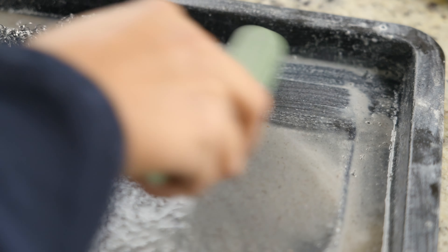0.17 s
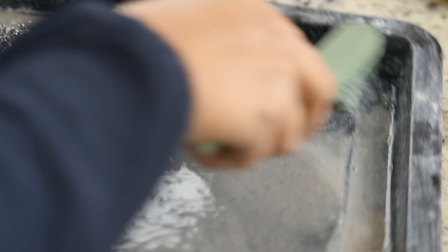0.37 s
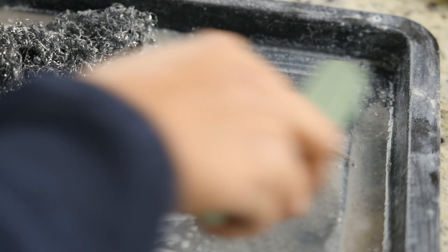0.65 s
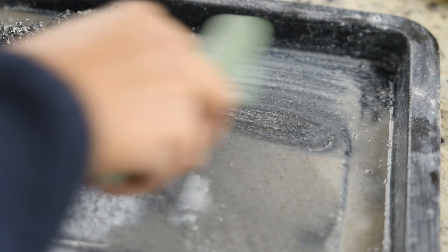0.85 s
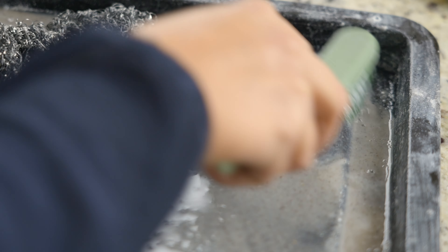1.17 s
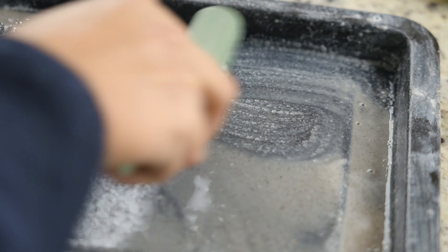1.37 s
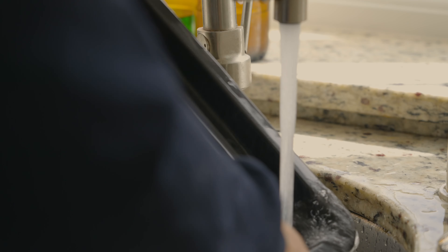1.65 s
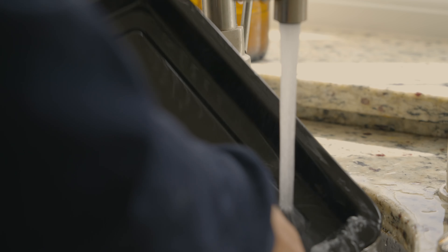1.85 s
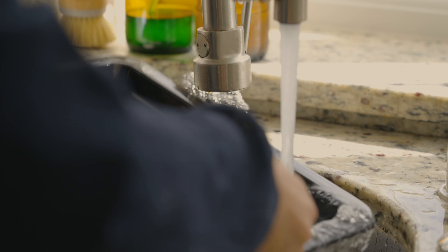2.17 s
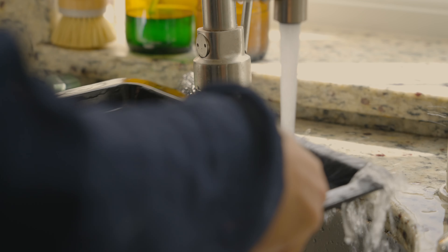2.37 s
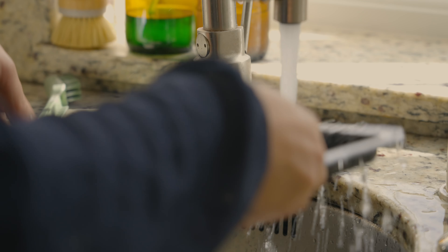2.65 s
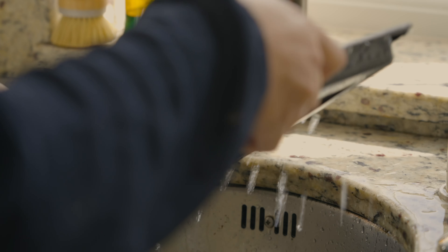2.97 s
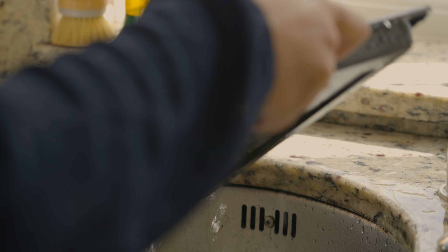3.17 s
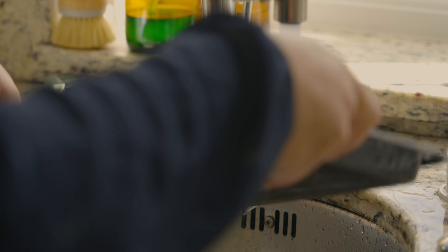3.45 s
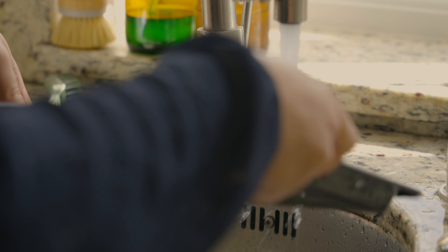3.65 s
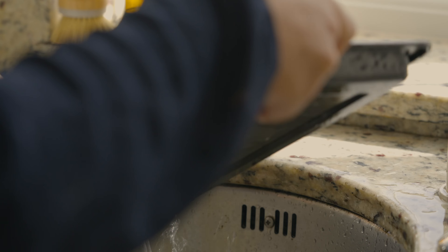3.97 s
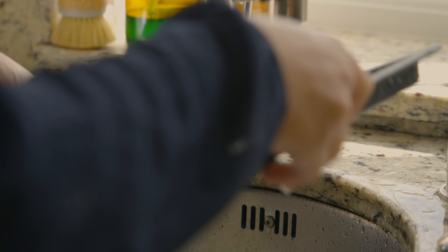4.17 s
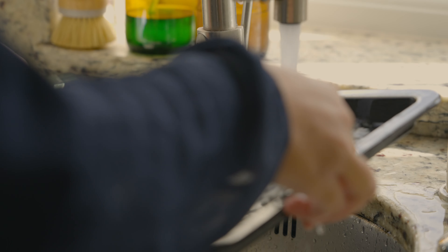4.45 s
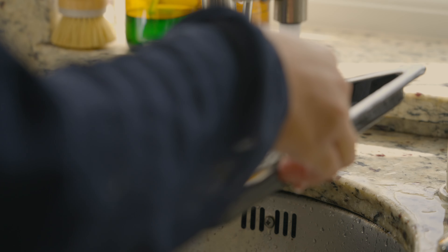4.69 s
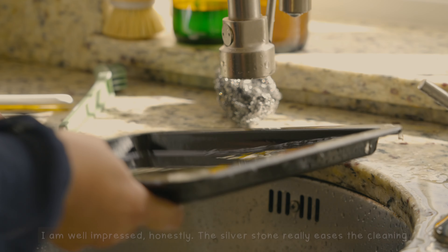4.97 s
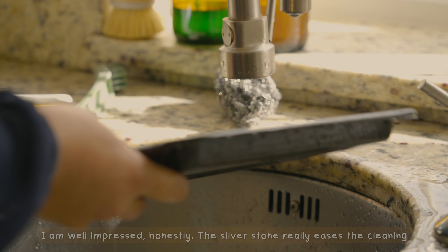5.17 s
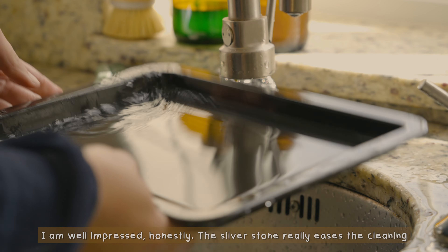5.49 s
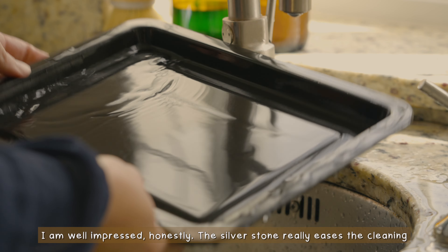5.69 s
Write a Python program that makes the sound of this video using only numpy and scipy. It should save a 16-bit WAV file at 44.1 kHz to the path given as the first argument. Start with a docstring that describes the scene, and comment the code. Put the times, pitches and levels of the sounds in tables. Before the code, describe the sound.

Quick rhythmic brush strokes rasp on a wet, gritty metal tray, then a tap rinses it with splashing and one loud clank before sudden quiet.

```python
"""Scrubbing and rinsing a baking tray

Quick brush strokes scour a wet, pasted tray: noise clicks hiss and rasp, and excite resonances of the sheet.
A running tap then rinses it: shaped clicks make spray and drumming, swarms of decaying sines make froth.
Water pours off and gurgles in the steel sink; the tray clanks against it, ringing decaying modes.
The water stops abruptly, leaving a quiet kitchen of shaped noise, and noise bursts for light clinks of the
tray being turned and thin high sizzles of water running over it."""
import sys
import numpy as np
from scipy import signal
from scipy.fft import rfft, irfft
from scipy.io import wavfile
from scipy.ndimage import map_coordinates

SR = 44100
rng = np.random.default_rng(int(sys.argv[2]) if len(sys.argv) > 2 else 0)


def file_out(sig):
    """Save sig as 16-bit WAV at sys.argv[1]."""
    # one column per channel
    cols = np.atleast_2d(sig).T
    # limit, then scale
    lim = np.clip(cols, -1, 1)
    pcm = np.round(lim * 32767).astype(np.int16)
    wavfile.write(sys.argv[1], SR, pcm)


N = 256662
TIME = np.arange(N) / SR

# All levels are relative, ahead of the layer gains.
# brush strokes: (top speed [s], hiss [dB], rise [s], fall [s], dig from pressing down [dB], sheet shudder [dB])
STROKES = [(0.096, -29.5, 0.026, 0.042, -31.5, -59), (0.269, -26.5, 0.022, 0.023, -65, -56),
           (0.46, -28, 0.026, 0.066, -21.5, -42.5), (0.682, -26, 0.038, 0.024, -38, -41.5),
           (0.849, -28.5, 0.0044, 0.065, -41, -39), (1.08, -28, 0.025, 0.032, -42, -36.5),
           (1.2, -31.5, 0.031, 0.038, -79, -54), (1.286, -27.5, 0.019, 0.054, -24, -38.5),
           (1.485, -34.5, 0.028, 0.071, -42, -41.5)]
# brush slowing to turn round: (time [s], level change [dB])
TURNS = [(0.035, -5.5), (0.19, -3.5), (0.59, -2.5), (0.755, -3.5), (0.99, -2), (1.406, -11), (1.56, -3.5)]
# spectrum of the bristle hiss: (frequency [Hz], level [dB])
HISS_SPECTRUM = [(300, -30), (1500, 3), (3000, -1.5), (4500, 0.5), (7000, 3.5), (9500, 0), (13500, 4),
                 (16000, -0.5)]
# spectrum of the grit: (frequency [Hz], level [dB])
GRIT_SPECTRUM = [(150, -36), (320, -27), (480, -13), (800, 6), (1300, 4), (2000, 3), (3400, 2.5),
                 (5000, -3), (7500, -8.5), (14000, -13)]
# modes of the tray pressed on the counter: (frequency [Hz], width [Hz], rubbed [dB], knocked [dB])
PRESSED_MODES = [(484, 15, -9.5, -11), (576.5, 51, 3, -3), (705, 52, -8.5, 3.5), (918, 17, -4, -20),
                 (1077, 34, -9, -3), (1375, 65, -13, -4), (1617, 46, -3, -12), (2052, 47, -2.5, -7),
                 (2860, 108, -6.5, 10.5), (3370, 88, -1.5, -30)]
# brush head knocking on the rim: (time [s], ring [dB], tick [dB])
BUMPS = [(0.3905, -26.5, -40), (0.3935, -20.5, -16), (1.436, -33, -30)]
# spray where the jet lands: (time [s], level [dB])
JET = [(1.57, -29), (1.67, -31.5), (1.79, -36), (2.67, -39.5), (2.78, -40), (3.02, -43.5), (3.17, -40),
       (3.41, -35.5), (3.87, -38.5), (4.1, -37.5), (4.46, -36.5)]
# jet drumming on the sheet: (time [s], level [dB])
DRUMMING = [(1.57, -43.5), (1.7, -54), (1.91, -42), (2.47, -47), (2.49, -48.5), (2.63, -40), (2.83, -40),
            (3.25, -58), (3.27, -47.5), (3.37, -58.5), (4.41, -41), (4.46, -44)]
# jet catching the swinging tray and fanning out: (time [s], extra spray [dB], extra splashing [dB])
SURGES = [(1.79, 4.5, 12.5), (2.02, 6, -1), (2.16, 4, -9), (2.57, 3.5, 2), (3.44, 3, -2.5), (3.87, 3, 6),
          (4.21, 2.5, 3)]
# spectrum of the spray: (frequency [Hz], level [dB])
SPRAY_SPECTRUM = [(500, -28), (2000, -11), (3200, -5.5), (4500, -2), (6500, -3), (9000, -5), (12000, -4.5),
                  (14500, -5.5), (16000, -2.5)]
# spectrum of the splashing: (frequency [Hz], level [dB])
SPLASH_SPECTRUM = [(200, -23.5), (600, -3), (1000, -7.5), (1400, -2.5), (2100, 2), (3200, -4), (4300, -2),
                   (6000, -16.5), (10000, -17)]
# spectrum of the stray drops: (frequency [Hz], level [dB])
DROP_SPECTRUM = [(500, -27.5), (1500, -11), (3000, -5), (5500, -2.5), (9000, -3), (15000, -11)]
# spectrum of the drumming: (frequency [Hz], level [dB])
DRUM_SPECTRUM = [(40, -17), (90, -11.5), (140, -7.5), (190, -1), (260, -0.5), (330, 6), (480, -3),
                 (700, -6), (950, -10), (1400, -26), (3000, -41.5)]
# water pouring off the tilted tray into the sink: (time [s], level [dB])
POUR = [(2.9, -64), (3.26, -50), (3.29, -43.5), (3.7, -52.5), (3.88, -41), (4.05, -44), (4.21, -40),
        (4.58, -42), (4.85, -59)]
# spectrum of the water churning in the sink: (frequency [Hz], level [dB])
BASIN_SPECTRUM = [(300, -23), (560, 4), (700, -8), (870, 1), (1200, -10.5), (1700, -3.5), (2100, -10),
                  (2600, -6), (3300, -25)]
# large air pockets ringing in the water: (time [s], level [dB], pitch [Hz], T60 [s], pitch rise [octave/s])
BUBBLES = [(3.044, -13, 989, 0.055, 4.5), (3.127, -28.5, 1535, 0.069, 5), (3.1628, -15.5, 6580, 0.01, -4),
           (3.396, -22, 3130, 0.035, 9), (3.569, -26, 683, 0.034, 1), (3.593, -29, 663, 0.12, -3),
           (3.6949, -16, 905, 0.074, -1), (3.716, -22, 1450, 0.031, 18), (3.802, -19.5, 1025, 0.019, 13.5),
           (3.838, -14.5, 890, 0.038, 15), (3.896, -22, 1050, 0.021, 25), (3.947, -20.5, 825, 0.042, 0.5),
           (3.973, -17.5, 676, 0.035, -11.5), (4.0214, -14.5, 920, 0.052, 1), (4.083, -19, 4680, 0.026, 5),
           (4.108, -23, 2457, 0.045, 5.5), (4.152, -17.5, 807, 0.04, 15), (4.173, -27.5, 824, 0.2, -8.5),
           (4.239, -20, 575, 0.066, 4), (4.2807, -18, 2460, 0.019, 10), (4.3385, -19.5, 2070, 0.027, 13.5),
           (4.388, -23.5, 925, 0.041, 4.5), (4.419, -22, 2450, 0.033, -2), (4.7851, -20, 1043, 0.021, 9)]
# gouts of water slapping the sink or thudding on the sheet: (time [s], level [dB], centre [Hz], T60 [s])
SLAPS = [(1.598, -33.5, 2300, 0.1), (1.757, -33, 1700, 0.088), (1.87, -35.5, 94, 0.12),
         (2.012, -41, 94, 0.28), (2.563, -29.5, 4500, 0.087), (2.947, -29.5, 3440, 0.032),
         (3.2664, -33, 590, 0.066), (3.265, -27.5, 2000, 0.018), (3.296, -23.5, 1630, 0.055),
         (3.326, -24.5, 1550, 0.04), (3.408, -31, 2030, 0.033), (3.466, -24, 7040, 0.023),
         (3.493, -16, 3360, 0.013), (3.533, -19.5, 3650, 0.024), (3.839, -16, 4630, 0.036),
         (4.1, -23.5, 5180, 0.05), (4.3315, -23.5, 2080, 0.017), (4.649, -25.5, 3560, 0.037),
         (4.695, -29.5, 5490, 0.034)]
# modes of the free tray: (frequency [Hz], level [dB], ungripped T60 [s])
FREE_MODES = [(172.8, -4.5, 0.2), (239, -2.5, 0.75), (280, -8, 1.7), (347, -6, 0.17), (390.5, -6, 0.21),
              (476.6, 4, 0.66), (598, -9.5, 0.54), (626, -7.5, 0.47), (789, -14.5, 0.18), (877, -13, 0.24),
              (960, -13.5, .3), (1325, -5, .15), (1767, -3, .2), (2085, -12.5, 0.084), (2425, -10, 0.27),
              (2730, -3, 0.15), (3110, -3.5, 0.43), (3130, 1.5, .2), (3640, -3.5, 0.35), (3760, -15, .14),
              (4480, -12, .35), (4818, -5.5, .3), (5426, -0.5, 0.22)]
# tray clanking on the sink: (time [s], ring [dB], crack [dB], T60 share left by the grip [1], lowest free pitch [Hz])
KNOCKS = [(4.4763, -24.5, -15, 1, 120.5), (4.483, -35.5, -15.5, 0.29, 1500), (4.5351, -38.5, -27, .5, 1487)]
# spectrum of the crack: (frequency [Hz], level [dB])
CRACK_SPECTRUM = [(60, -39), (130, -25), (180, -2), (500, -8), (1200, -7.5), (2500, -4.5), (3800, 2.5),
                  (5500, -5), (8000, -1.5), (9500, -7.5), (16000, -9.5)]
# light clinks of the tray being turned, and thin high sizzles of water running over it:
# (time [s], level [dB], pitch [Hz], T60 [s], width [Hz])
CLINKS_AND_SIZZLES = [(4.925, -67.5, 3650, 0.3, 397), (5.222, -66, 6840, 0.11, 799),
                      (5.231, -63.5, 3200, 0.13, 250), (5.381, -59, 11300, 0.32, 1790),
                      (5.386, -49, 3190, 0.054, 300), (5.418, -53, 7960, 0.086, 1300),
                      (5.515, -52.5, 3480, 0.061, 800), (5.5432, -42.5, 3230, 0.088, 1980),
                      (5.545, -44, 2480, 0.18, 700), (5.72, -66, 11780, 0.46, 1800),
                      (5.734, -46, 2240, 0.041, 280)]
# spectrum of the quiet kitchen: (frequency [Hz], level [dB])
HUSH_SPECTRUM = [(15, -45), (25, -28), (43, -11.5), (64, -7), (134, -17.5), (153, -17.5), (301, -25),
                 (427, -26), (1020, -23), (2280, -41), (3250, -38), (3920, -43), (16000, -43.5)]
# swell of the quiet kitchen: (time [s], level [dB])
HUSH_SWELL = [(1.5, 1), (1.7, 3.5), (3, 1), (5.8, 2.5)]
# reverberation of sink and walls: (frequency [Hz], T60 [s])
REVERB = [(150, 0.27), (1000, 0.34), (4000, 0.27), (8000, 0.46), (15000, 0.11)]

RINSE_FROM_S, RINSE_TO_S = 1.565, 4.923
HUSH_DB, EDGE_HZ = -60.5, 15900
TURN_S = 0.015  # how long the brush lingers at a turn
DRAG_HISS_DB, DRAG_DRONE_DB = -33.5, -45.5  # bristles and sheet between strokes
RASP_DB, RASP_HZ, RASP_WIDTH_HZ = -1, 4140, 1830
RASP_POWER = 0.29  # the rasp's share grows as this power of brush speed
DIG_S, DIG_HZ, DIG_WIDTH_HZ = 0.015, 2600, 2000
SHUDDER_STRETCH = 2.04  # shudder fall over stroke fall
EBB_AT_S, EBB_DB_PER_S = 4.32, 15  # the flow dwindles
SURGE_RISE_S, SURGE_FALL_S = 0.028, 0.05
SPLASH_OF_JET_DB, SPLASH_OF_POUR_DB = -14.5, 2
DROPS_DB, DROPS_POWER = -21, 0.5  # power of the pour
PATTER_DB, PATTER_HZ, PATTER_WIDTH_HZ = -46.5, 667, 330
PATTER_POWER = 2.2  # power of the drumming
PLINK_DB = -6
SPLAT_DB, SPLAT_HZ, SPLAT_T60_S = -20.5, 4500, 0.012  # tick of the drop that traps a large bubble
GRIP_AT_S = 4.592  # the fingers close on the ringing tray
LINGER_DB, LINGER_T60_S = -16, 0.49


def amp(db):
    """Decibels to gain."""
    return 10 ** (np.asarray(db) / 20)


def unit(x):
    """Scales to an rms of one."""
    return x / np.sqrt(np.mean(x ** 2) + 1e-20)


def decay(t, t60_s):
    """Exponential fall of 60 dB in one T60."""
    return np.exp(-np.log(1000) * t / t60_s)


def read(points, hz):
    """Interpolates a spectrum on a log-frequency axis."""
    f, value = np.transpose(points)
    return np.interp(np.log(hz + 1), np.log(f + 1), value)


def level(rows):
    """Gain curve from (time [s], level [dB]) points."""
    return amp(np.interp(TIME, *np.transpose(rows)))


def bell(s, rise_s, fall_s):
    """Gaussian swell peaking at one, with separate rise and fall."""
    spread_s = np.where(TIME < s, rise_s, fall_s)
    return np.exp(-0.5 * np.minimum(((TIME - s) / spread_s) ** 2, 60))


def add(mix, s, sound):
    """Mixes a sound in at a time, in place."""
    part = mix[round(s * SR):][:len(sound)]
    part += sound[:len(part)]


def colour(x, points):
    """Imposes a spectral gain, at an rms of one."""
    gain = amp(read(points, np.fft.rfftfreq(len(x), 1 / SR)))
    return unit(irfft(rfft(x) * gain, len(x)))


def resonate(x, hz, width_hz):
    """Two-pole resonance with a gain of about one at its centre."""
    r = np.exp(-np.pi * width_hz / SR)
    return signal.lfilter([1 - r, 0, r - 1], [1, -2 * r * np.cos(2 * np.pi * hz / SR), r * r], x)


def resonate_twice(x, hz, width_hz):
    """Two equal resonances in series, for steeper skirts."""
    return resonate(resonate(x, hz, width_hz), hz, width_hz)


def flutter(per_s, depth_db):
    """Random gain through so many new values a second."""
    knots = rng.standard_normal(N)
    return amp(depth_db * np.interp(TIME * per_s, np.arange(N), knots))


def shifting(x, depth_db, span_hz, span_s):
    """Resonances come and go as the point of contact wanders over the sheet."""
    hz, t, z = signal.stft(x, SR, nperseg=512)
    knots = rng.standard_normal((128, 512))
    grid = np.meshgrid(hz / span_hz, t / span_s, indexing="ij")
    patches = map_coordinates(knots, grid, order=1, mode="mirror")
    return unit(signal.istft(z * amp(depth_db * patches), SR, nperseg=512)[1][:N])


def clicks(per_s, spread_db):
    """Random tiny impacts, mostly small and a few large."""
    size = amp(spread_db * np.minimum(rng.exponential(1, N), 4))
    sign = rng.choice([-1, 1], N)
    return unit(size * sign * (rng.random(N) < per_s / SR))


def burst(hz, width_hz, t60_s):
    """Decaying puff of noise inside one resonance."""
    t = np.arange(SR // 3) / SR
    noise = resonate_twice(rng.standard_normal(len(t)), hz, width_hz)
    return unit(noise) * decay(t, t60_s)


def bubble(hz, t60_s, rise_oct_per_s, swell_s):
    """Ringing air pocket whose pitch slides as it nears the surface."""
    t = np.arange(int(t60_s * SR) + 2) / SR
    phase = 2 * np.pi * np.cumsum(hz * 2 ** (rise_oct_per_s * t)) / SR
    return np.sin(phase) * decay(t, t60_s) * (1 - np.exp(-t / swell_s))


def froth(low_hz, high_hz, per_s, cycles, spread_db, count):
    """Swarms of small bubbles of many sizes, each ringing for some cycles."""
    out = np.zeros(N)
    for hz in np.geomspace(low_hz, high_hz, count):
        place, size, sign = rng.random((int(per_s * N / SR / count), 3)).T
        impulses = np.sign(sign - 0.5) * amp(-spread_db * np.log(size + 0.055))
        train = np.bincount((place * N).astype(int), impulses, N)
        ring = bubble(hz, cycles / hz, 0.15 * hz / cycles, swell_s=0.5 / hz)
        out += signal.oaconvolve(train, ring * hz)[:N]
    return unit(out)


def wavering(hz, stray_hz, per_s):
    """One second of a mode whose pitch strays as water and grip shift on the sheet."""
    t = np.arange(SR) / SR
    stray = stray_hz * np.interp(t * per_s, np.arange(1000), rng.standard_normal(1000))
    return rng.choice([-1, 1]) * np.sin(2 * np.pi * np.cumsum(hz + stray) / SR)


def hush():
    """Quiet kitchen: steady shaped noise, swelling slowly."""
    return amp(HUSH_DB) * level(HUSH_SWELL) * colour(rng.standard_normal(N), HUSH_SPECTRUM)


def scrubbing():
    """Bristles flick over grit: speed makes hiss and a coarse rasp, pressing down adds short digs; the sheet drones."""
    fine = shifting(colour(clicks(16000, spread_db=1), HISS_SPECTRUM), depth_db=1.5, span_hz=660, span_s=0.047)
    grit = shifting(colour(clicks(3700, spread_db=2), GRIT_SPECTRUM), depth_db=3.5, span_hz=308, span_s=0.05)
    # hiss and drone add up as powers
    hiss, drone, dig = amp(DRAG_HISS_DB) ** 2, amp(DRAG_DRONE_DB) ** 2, 0
    for s, hiss_db, rise_s, fall_s, dig_db, drone_db in STROKES:
        hiss = hiss + (amp(hiss_db) * bell(s, rise_s, fall_s)) ** 2
        drone = drone + (amp(drone_db) * bell(s, rise_s, SHUDDER_STRETCH * fall_s)) ** 2
        dig = dig + amp(dig_db) * bell(s, DIG_S, DIG_S)
    moving = amp(sum(db * bell(s, TURN_S, TURN_S) for s, db in TURNS))
    speed = moving * np.sqrt(hiss)
    bite = (speed / speed.max()) ** RASP_POWER
    rasp = amp(RASP_DB) * speed * bite * unit(resonate(grit, RASP_HZ, RASP_WIDTH_HZ))
    rasp += dig * unit(resonate(grit, DIG_HZ, DIG_WIDTH_HZ))
    # the brush sticks and slips in spurts
    slips = clicks(1300, spread_db=1) * flutter(55, depth_db=3)
    sheet = unit(sum(amp(db) * resonate(slips, hz, width_hz) for hz, width_hz, db, _ in PRESSED_MODES))
    bristles = amp(1.5) * speed * fine * flutter(380, depth_db=0.5)
    bristles += amp(-3.5) * rasp * flutter(960, depth_db=0.6)
    return (bristles + np.sqrt(moving * drone) * sheet) * (TIME < RINSE_FROM_S)


def reflections(x):
    """Dense reflections from the sink and hard walls, each band dying at its own speed."""
    taps = rng.standard_normal(SR) * (rng.random(SR) < 0.1)
    taps *= np.arange(SR) > 0.004 * SR  # nothing returns within 4 ms
    hz, t, z = signal.stft(taps, SR, nperseg=256)
    tail = signal.istft(z * decay(t, read(REVERB, hz)[:, None]), SR, nperseg=256)[1]
    return signal.fftconvolve(x, tail / np.linalg.norm(tail))[:N]


def bumps(tick_t60_s=0.019, tick_hz=5800):
    """The brush head ticks on the rim and briefly rings the damped sheet."""
    out, t = np.zeros(N), np.arange(SR // 4) / SR
    for s, ring_db, tick_db in BUMPS:
        ring = np.zeros(len(t))
        for hz, width_hz, _, db in PRESSED_MODES:
            mode = np.sin(2 * np.pi * hz * t) * np.exp(-np.pi * width_hz * t)
            ring += amp(db) * rng.choice([-1, 1]) * mode
        add(out, s, amp(ring_db) * ring * (1 - np.exp(-t / 0.0011)))
        add(out, s, amp(tick_db) * burst(tick_hz, 0.58 * tick_hz, tick_t60_s))
    return out


def rinsing(spray_db=1.5, drum_db=0.5):
    """The jet breaks into fine spray, splashes into small bubbles, flings drops and drums on the sheet."""
    ebb = amp(-EBB_DB_PER_S * np.maximum(TIME - EBB_AT_S, 0))
    jet, drumming, pour = ebb * level(JET), ebb * level(DRUMMING), level(POUR)
    fanning = amp(sum(db * bell(s, SURGE_RISE_S, SURGE_FALL_S) for s, db, _ in SURGES))
    frothing = amp(sum(db * bell(s, SURGE_RISE_S, SURGE_FALL_S) for s, _, db in SURGES))

    spray = colour(clicks(12000, spread_db=2.5), SPRAY_SPECTRUM)
    spray = shifting(spray, depth_db=3, span_hz=636, span_s=0.045)
    spray = amp(spray_db) * jet * fanning * spray * flutter(120, depth_db=2)

    # jet and pour both throw up small bubbles
    splash = colour(froth(500, 9000, per_s=1700, cycles=57, spread_db=2.5, count=44), SPLASH_SPECTRUM)
    splash = frothing * np.hypot(amp(SPLASH_OF_JET_DB) * jet, amp(SPLASH_OF_POUR_DB) * pour) * splash

    # a drop takes a few milliseconds to flatten and break up
    splats = signal.oaconvolve(clicks(39, spread_db=7.5), burst(6000, 12000, 0.011))[:N]
    drops = amp(DROPS_DB) * pour ** DROPS_POWER * colour(splats, DROP_SPECTRUM)

    drum = amp(drum_db) * drumming * colour(clicks(1600, spread_db=2), DRUM_SPECTRUM)
    # a square hit on the sheet adds a higher patter
    patter = unit(resonate_twice(clicks(560, spread_db=1.5), PATTER_HZ, PATTER_WIDTH_HZ))
    patter = amp(PATTER_DB) * (drumming / drumming.max()) ** PATTER_POWER * patter
    return spray + splash + drops + drum + patter


def runoff():
    """Water pours off the tray, slaps the sink, churns there and traps large bubbles."""
    churn = colour(froth(480, 2800, per_s=450, cycles=26, spread_db=4.5, count=30), BASIN_SPECTRUM)
    # stray drops plink into the pooled water
    plinks = froth(1300, 3200, per_s=45, cycles=39, spread_db=3.5, count=16)
    out = level(POUR) * (amp(-1.5) * churn + amp(PLINK_DB) * plinks)
    for s, db, hz, t60_s, rise_oct_per_s in BUBBLES:
        add(out, s, amp(db) * bubble(hz, t60_s, rise_oct_per_s, swell_s=0.00044))
        add(out, s, amp(db + SPLAT_DB) * burst(SPLAT_HZ, SPLAT_HZ, SPLAT_T60_S))
    for s, db, hz, t60_s in SLAPS:
        add(out, s, amp(db) * burst(hz, 0.63 * hz, t60_s))
    return out


def knocks(crack_t60_s=0.061, rattle_db=-11, rattle_t60_s=0.43, snap_db=10):
    """Each blow snaps and cracks, sets the dense upper modes rattling and rings the tray's main modes."""
    out, t = np.zeros(N), np.arange(SR) / SR
    for s, ring_db, crack_db, free, lowest_hz in KNOCKS:
        # the closing fingers take 6 dB off the ring
        grip = amp(-6 * np.clip((s + t - GRIP_AT_S) / 0.012, 0, 1))
        ring = np.zeros(len(t))
        for hz, db, t60_s in FREE_MODES:
            if hz > lowest_hz:
                mode = wavering(hz, stray_hz=0.3 * np.sqrt(hz), per_s=110)
                ring += amp(db) * mode * decay(t, t60_s * free)
        shape = decay(t, crack_t60_s) + amp(rattle_db) * decay(t, rattle_t60_s * free)
        crack = shape * colour(rng.standard_normal(len(t)), CRACK_SPECTRUM)
        add(out, s, amp(ring_db) * ring * grip * (1 - np.exp(-t / 0.0025)))
        add(out, s, amp(crack_db) * crack)
        add(out, s, amp(crack_db + snap_db) * burst(6500, 3500, 0.0037))
    return out


def clinks_and_sizzles():
    """Light clinks of the turned tray and thin high sizzles of running water: noise bursts that linger faintly."""
    out = np.zeros(N)
    for s, db, hz, t60_s, width_hz in CLINKS_AND_SIZZLES:
        linger = amp(LINGER_DB) * burst(hz, width_hz, LINGER_T60_S)
        add(out, s, amp(db) * (burst(hz, width_hz, t60_s) + linger))
    return out


def scene():
    """Scrubbing, then rinsing that ends abruptly, then clinks and sizzles, all over the room's hush."""
    brush = scrubbing()
    water = rinsing() * (TIME >= RINSE_FROM_S)
    pour = runoff()
    blows = bumps() + knocks()
    light = clinks_and_sizzles()
    sent = amp(-12.5) * brush + amp(-10.5) * water + amp(-8) * pour + amp(-5.5) * blows
    work = brush + water + pour + blows + reflections(sent)
    ending = np.clip((RINSE_TO_S - TIME) / 0.002, 0, 1)
    return (work * ending + light + amp(-12) * reflections(light) + hush())[None]


def record(dry):
    """Full-scale clipping, then the band limit."""
    lowpass = signal.firwin(511, EDGE_HZ, window=("kaiser", 9), fs=SR)
    return signal.oaconvolve(np.clip(dry, -1, 1), lowpass[None], "same")


dry = scene()
out = record(dry)
file_out(out)
```